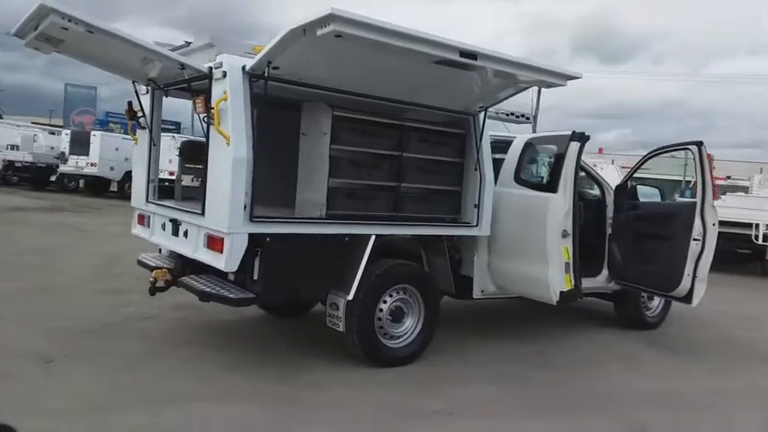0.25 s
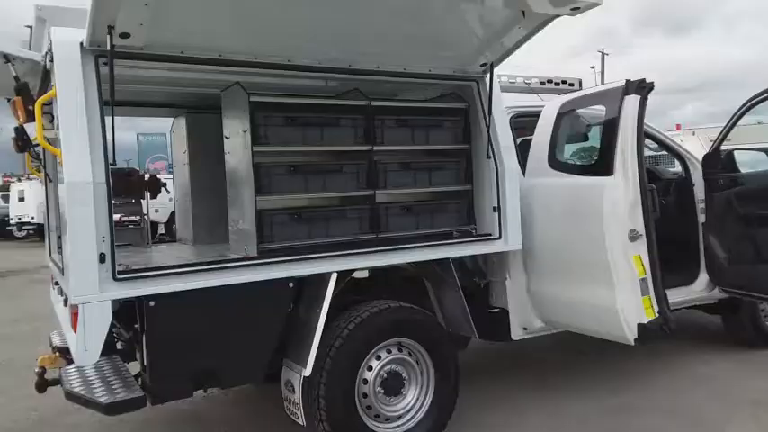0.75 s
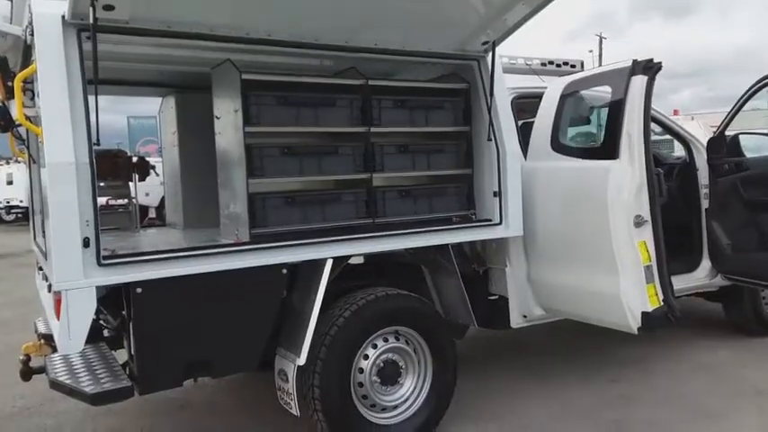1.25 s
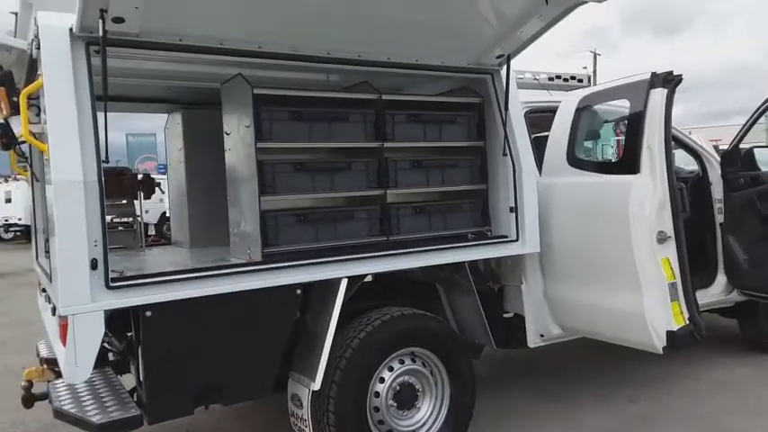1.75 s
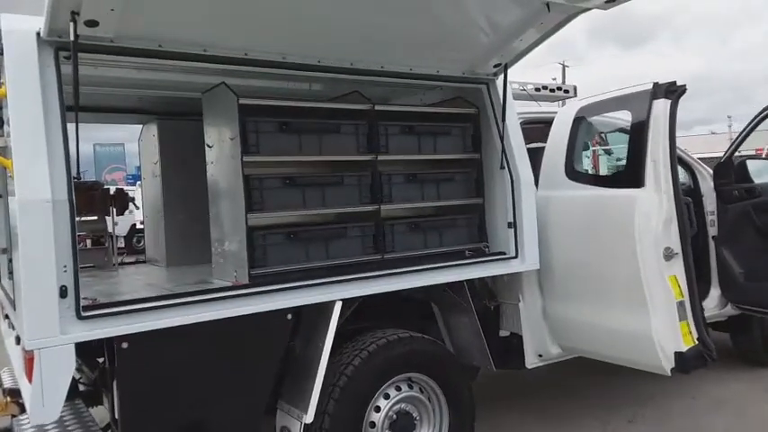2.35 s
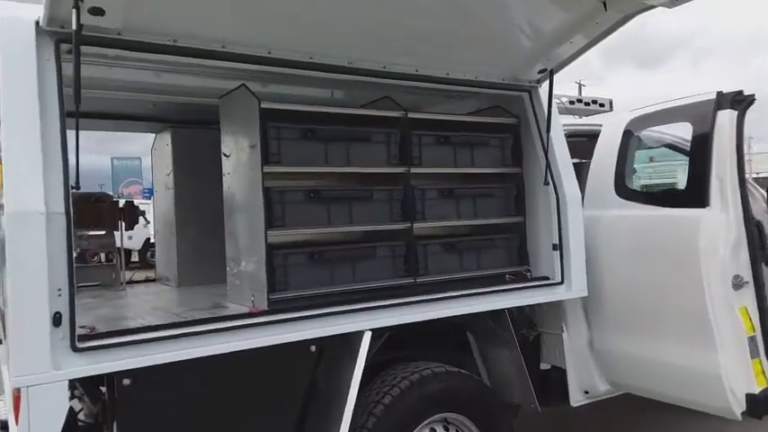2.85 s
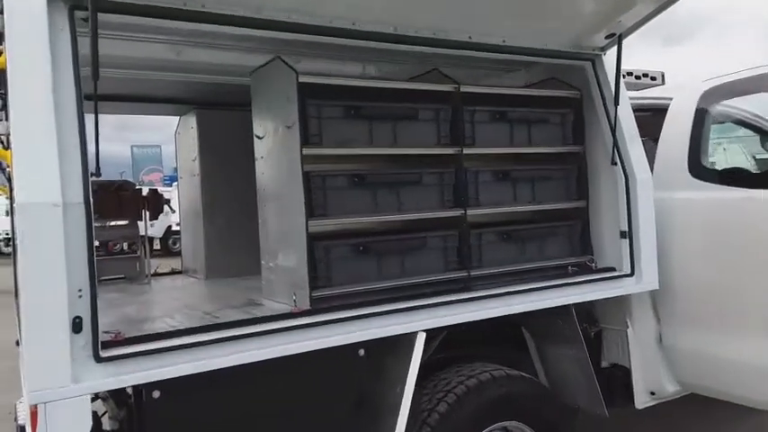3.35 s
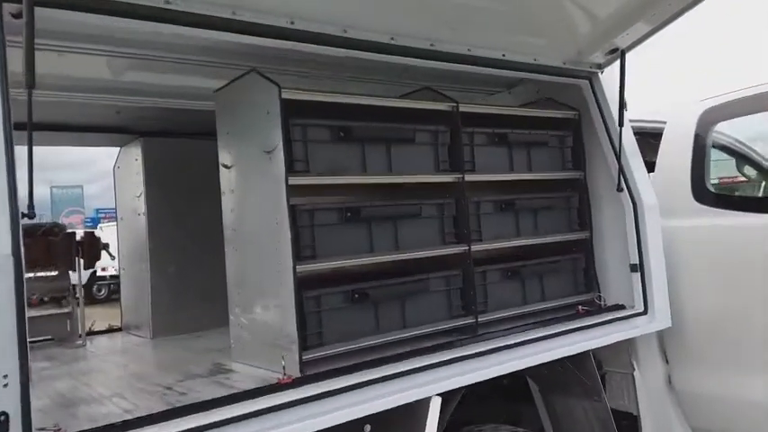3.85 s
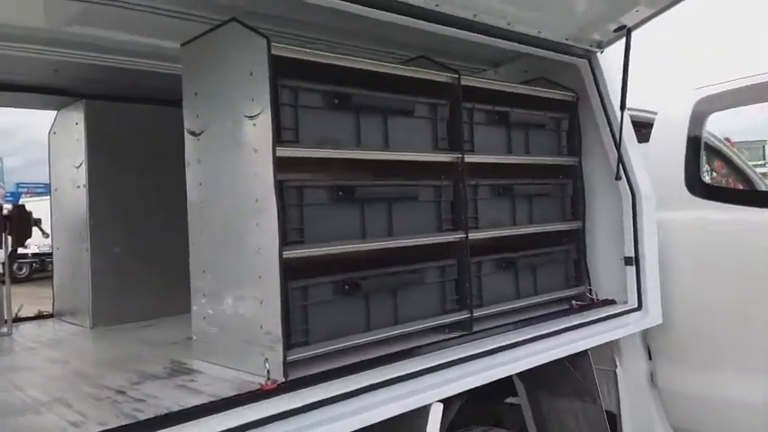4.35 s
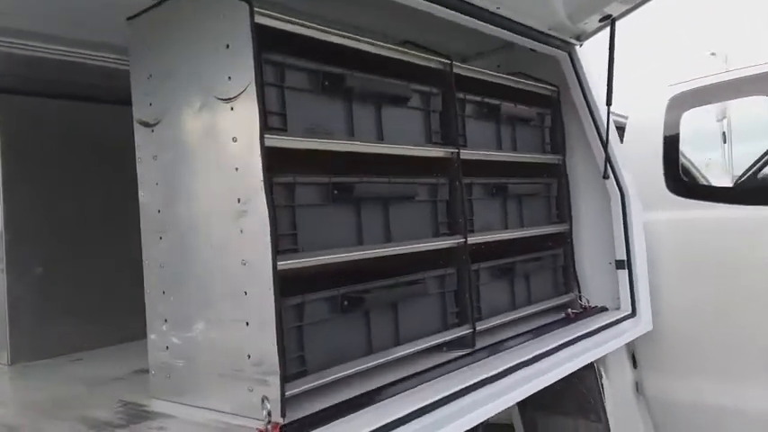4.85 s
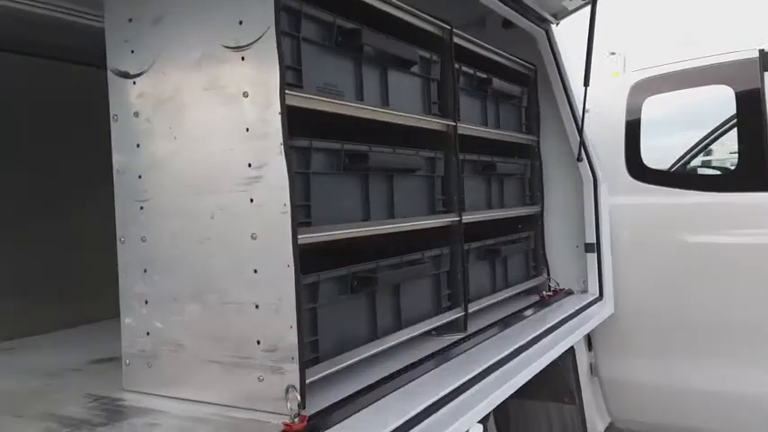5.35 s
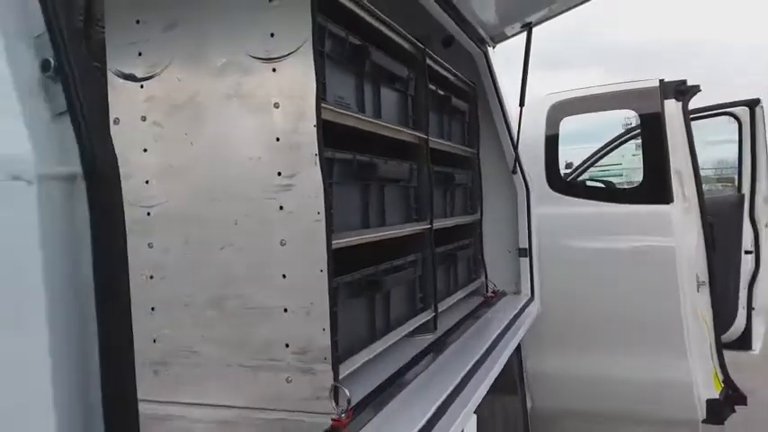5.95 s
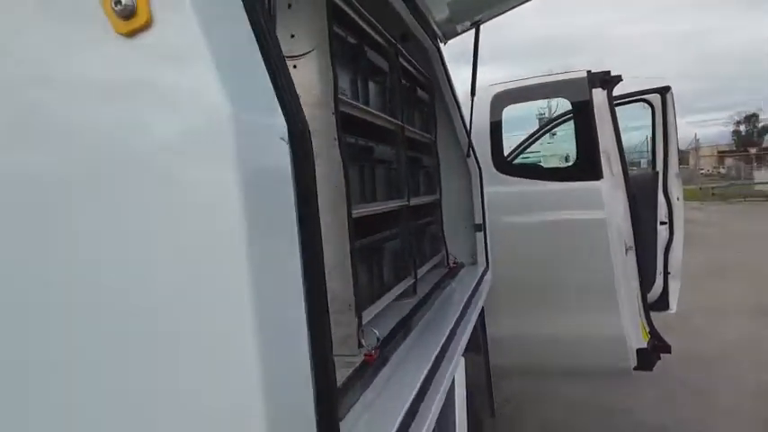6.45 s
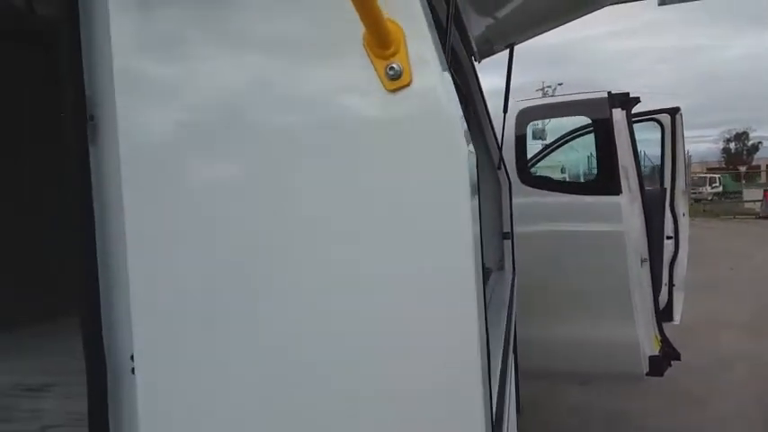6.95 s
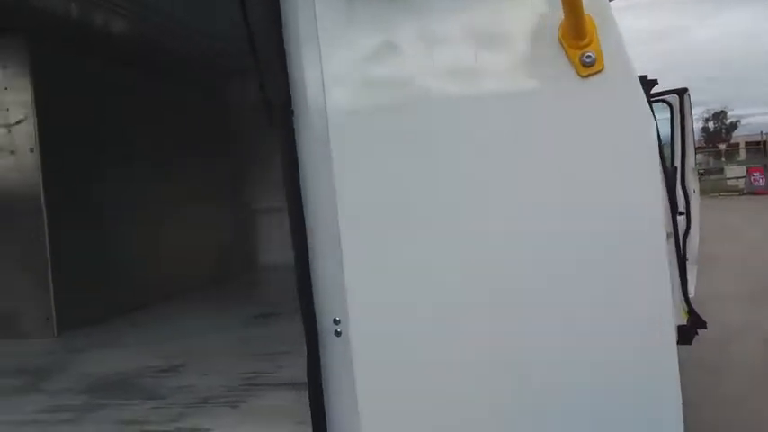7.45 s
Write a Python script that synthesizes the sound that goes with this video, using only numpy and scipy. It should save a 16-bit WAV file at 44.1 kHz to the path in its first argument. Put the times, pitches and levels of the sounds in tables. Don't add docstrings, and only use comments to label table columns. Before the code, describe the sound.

A diesel truck idles continuously outdoors, with rapid metallic knock, low exhaust hum, broad fan-like roar and fine hiss. After initial silence it fades in quickly and comes near. Low wind bumps hit one side of the handheld stereo microphone; dry footsteps snap and scuff on grit, with small distant bird chirps. Near the end the treble drops and a hollow hum grows from the open load box.

```python
import sys
import numpy as np
from scipy import signal
from scipy.fft import rfft, irfft, next_fast_len
from scipy.io import wavfile
from scipy.ndimage import uniform_filter1d, map_coordinates

SR = 44100
rng = np.random.default_rng(int(sys.argv[2]) if len(sys.argv) > 2 else 0)


def nominal_scale(level):
    x = np.asarray(level, float) / 20
    return 10 ** x


def materialize(psi):
    bounded = np.clip(np.atleast_2d(psi).T, -1, 1)
    quanta = np.round(bounded * 32767).astype(np.int16)
    wavfile.write(sys.argv[1], SR, quanta)


N = 340011
T = np.arange(N) / SR
FIRE_HZ, FIRST_FIRE_S = 26.72, 2.011


def engine():
    # time in seconds, nearness in dB,
    # screening of the engine bay by the body in dB, extra path of the load box echo in metres.
    approach = [(1.0, -8.5, 1, 4.4), (1.2, -6.5, 0, 4.2), (1.79, -5.5, 0.5, 4.6), (1.9, -3, 0.5, 4.6),
                (2.14, -.3, 0, 4), (3.0, 0.15, 0, 4.4), (3.9, -0.53, .5, 4.3), (4.6, 0.24, 0.16, 4.5),
                (5.45, -0.2, .2, 1.8), (5.7, -1.15, -0.7, 2), (6.25, -0.1, -4, 1.5), (6.55, .2, -6, 1),
                (6.9, 0, -7, 0.99), (7.2, 0, -6, 1), (7.71, -0.2, -5.5, 1.1)]
    # frequency in Hz, level in dB per Hz.
    rumble_colour = [(14, -40), (22, -20), (40, -9.5), (60, -2.5), (112, 0), (160, -0.5), (262, -5),
                     (310, -8), (370, -18), (500, -23), (700, -62)]
    roar_colour = [(210, -38), (350, -2), (451, -5.5), (547, -2.5), (922, -3), (1020, -5), (1590, -8),
                   (1890, -10.5), (2200, -14.5), (2860, -26), (4840, -120)]
    bay_colour = [(1060, -34), (1800, -4), (2190, -5), (2890, -1.5), (3330, -4), (3660, -3), (3990, -6),
                  (6000, -16), (7800, -22), (13200, -120)]
    hiss_colour = [(2820, -17.5), (4800, -4), (4940, -5.5), (7240, -8), (8490, -5.5), (12600, -13),
                   (14000, -18), (15700, -21.5)]

    near_db, screen_db, path_m = curves(approach)
    rumble_db = -36.5 + near_db - 0.092 * screen_db
    roar_db = -43.5 + near_db + 0.28 * screen_db
    bay_db = -46.5 + near_db + 0.82 * screen_db
    hiss_db = -54 + near_db + 0.99 * screen_db

    modes, throb = knock()
    rumble = coloured(rumble_colour, 1.85, 9)
    roar = (0.87 + 0.18 * throb) * coloured(roar_colour, 0.97, 9)
    bay = nominal_scale(-1) * (0.68 + 0.32 * throb) * coloured(bay_colour, 0.8, 12)
    bay = bay + nominal_scale(-3.5 + 0.6 * screen_db) * modes * np.array([[1.15], [0.75]])
    hiss = (0.92 + 0.13 * throb) * coloured(hiss_colour, 0.96, 10)
    injectors = unit(band(rng.standard_normal((2, N)), 10500, 14200))
    hiss = hiss + nominal_scale(-13 + 2 * walk(14)) * throb * injectors

    pair = nominal_scale(rumble_db - 2) * rumble + nominal_scale(roar_db + 0.57) * roar
    pair = pair + nominal_scale(bay_db + 1) * bay + nominal_scale(hiss_db + 1.5) * hiss
    pair[0] += nominal_scale(0.1) * (exhaust(near_db, bay_db, path_m) + load_box() + second_motor())
    return pair


def exhaust(near_db, bay_db, path_m):
    # firing order, rms in dB.
    pipe_orders = [(2, -47.5), (3, -54), (4, -45), (7, -50.5), (10, -56)]
    # firing order, level in dB re the engine bay.
    block_orders = [(5, -12.5), (6, -10), (8, -3.5), (9, -8)]
    pipe_db = near_db + 1.2 * (T - 6.86)
    turn = 2 * np.pi * FIRE_HZ * (T - FIRST_FIRE_S)

    def hum(order, level):
        phase = order * turn + 6.3 * rng.random() + 0.39 * walk(2.98)
        return level * nominal_scale(1.7 * walk(4)) * np.sqrt(2) * np.sin(phase)

    out = np.zeros(N)
    for order, db in pipe_orders:
        order = round(order)
        echo = np.abs(1 - 0.31 * np.exp(2j * np.pi * order * FIRE_HZ * path_m / 343))
        out += hum(order, nominal_scale(pipe_db + db) * echo)
    for order, db in block_orders:
        out += hum(round(order), nominal_scale(bay_db + db))
    return out


def knock():
    # frequency in Hz, width in Hz, level in dB.
    block_modes = [(2425, 50, -2.5), (2760, 80, -7), (2897, 70, -1), (3120, 80, -6), (3745, 75, -1.5),
                   (4498, 50, -1.5), (8440, 310, -18), (11800, 300, -22)]
    cylinder_db = [-1, -0.32, 1.4, -0.98]

    cycle = (T - FIRST_FIRE_S) * FIRE_HZ
    index = np.floor(cycle).astype(int)
    since = (cycle % 1) / FIRE_HZ
    index = index - index[0] + (index[0] % 4)
    size = nominal_scale(2.1 * rng.standard_normal((index[-1] + 1, 2 * len(block_modes))))
    strength = nominal_scale(np.array(cylinder_db)[index % 4])
    pilot = np.exp(-since / 0.002)
    late = np.maximum(since - 0.009, 0)
    main = (late > 0) * (np.exp(-late / 0.0015) + 0.32 * np.exp(-late / 0.016))
    out = 0
    for k, (hz, width, db) in enumerate(block_modes):
        pilot_size, main_size = size[index, 2 * k], size[index, 2 * k + 1]
        burn = strength * (pilot_size * pilot + 0.76 * main_size * main + 0.18)
        mode = unit(ring(burn * rng.standard_normal((2, N)), hz, 0.9 * width))
        out = out + nominal_scale(db) * np.sqrt(width) * mode
    return unit(out), unit(strength * np.exp(-since / 0.033))


def load_box():
    # time in seconds, frequency in Hz, rms in dB.
    boom = [(5.2, 280, -74), (5.9, 272, -53), (6.6, 268.6, -53), (7.1, 264.2, -49.5), (7.4, 260.2, -45.5),
            (7.71, 257.6, -44)]
    hz, db = curves(boom)
    phase = 2 * np.pi * np.cumsum(hz) / SR + 1.1 * walk(16)
    return nominal_scale(db + 1 + 2.5 * walk(16)) * np.sqrt(2) * np.sin(phase)


def footsteps():
    # time in seconds, peak in dB, centre in Hz, cycles, lag of the right port in samples.
    ticks = [(3.4950, -30, 11000, 2.5, 4), (3.4955, -22.5, 5200, 2.5, 3), (3.6005, -21, 1400, 1.5, 5),
             (3.9225, -28, 1200, 1.3, 5), (4.6470, -22, 1310, 0.98, 10), (4.6507, -20, 1450, 1.3, 8),
             (5.312, -38.5, 4500, 90, 0), (5.3885, -28, 8000, 1.2, 4), (5.4761, -17.5, 1550, 1, 6),
             (5.536, -25, 2600, 2.5, 5), (5.545, -29, 1800, 3.5, 6), (5.5945, -28, 7000, 1.1, 5),
             (6.298, -35, 1800, 1.4, 4), (6.4045, -28, 2100, 3.5, 2), (6.4062, -29, 3200, .9, 2),
             (6.416, -39, 4750, 20, 1.5), (7.2349, -25.5, 3800, 2.1, 11), (7.238, -29.5, 2320, 2.2, 4.5),
             (7.399, -38, 9000, 3.5, 5), (7.4718, -26, 4500, .8, 1.5), (7.5103, -25, 10500, 1.1, 5)]
    # start in seconds, length in seconds, rms in dB, low edge in Hz, high edge in Hz.
    scuffs = [(3.494, .014, -39, 4200, 12800), (3.503, 0.018, -36.5, 2900, 10000),
              (3.505, .02, -55, 12000, 15800), (4.636, 0.043, -41, 600, 3800),
              (5.283, .045, -45.5, 4000, 11900), (5.386, .03, -49, 5000, 10000),
              (5.488, 0.09, -46.5, 3000, 10700), (5.489, .075, -39, 700, 3200),
              (5.59, .3, -57, 5000, 15500), (6.213, .055, -50.5, 4300, 7000),
              (6.401, .03, -48.5, 1500, 7500), (7.15, .09, -59, 10000, 15500), (7.18, .06, -58, 3500, 5500),
              (7.455, 0.26, -57, 6500, 15000), (7.498, 0.033, -53, 7000, 13000),
              (7.591, .05, -54, 7000, 14000)]
    pan_db = 1.5

    out = np.zeros((2, N))
    for s, db, hz, cycles, lag in ticks:
        add(out[0], s, db, hz, cycles)
        add(out[1], s + lag / SR, db, hz, cycles)
    for s, length, db, lo_hz, hi_hz in scuffs:
        x = (T - s) / length
        shape = np.clip(x * 15, 0, 1) * np.exp(-np.clip(x, 0, 9) ** 3)
        grit = rng.standard_normal((3, N)) * nominal_scale(1.7 * rng.exponential(size=N))
        grit = grit[:2] + 0.82 * grit[2]
        grit = unit(band(band(grit, lo_hz, hi_hz), lo_hz, hi_hz))
        out += shape * grit * nominal_scale([[db + pan_db / 2], [db - pan_db / 2]])
    return out


def gust():
    # time in seconds, peak in dB, centre in Hz, cycles.
    thumps = [(2.562, -26, 110, 1.5), (2.661, -22, 110, 1.6), (2.748, -17.5, 173, 2.1),
              (2.813, -19.5, 110, 1.2), (2.83, -17, 220, 1.1), (2.842, -21, 85, 1.7),
              (2.878, -22, 89.5, 1.7), (2.94, -16.5, 173, 2.3), (2.972, -14.5, 135, 1.3),
              (3.017, -26, 85, 1.4)]
    out = np.zeros(N)
    for thump in thumps:
        add(out, *thump)
    return np.outer([0.06, 1], out)


def sparrow():
    # time of the crest in seconds, crest in Hz, lead-in in dB, crest in dB, falling tail in dB.
    chirps = [
        (4.531, 4680, -52, -47, -62),
        (5.970, 5450, -52, -60, -51),
        (7.029, 5760, -54, -48.5, -55),
    ]
    lead_hz, end_hz, drop = 4660, 3400, 0.85
    lead_s, lead_width_s, crest_s, tail_s = 0.015, 0.006, 0.005, 0.1
    trill_hz = 31

    def bell(x, width):
        return np.exp(-(x / width) ** 2)

    out = 0
    for s, crest_hz, lead_db, crest_db, tail_db in chirps:
        x = T - s
        hz = np.interp(x, [-lead_s + crest_s, -crest_s, crest_s, 2 * crest_s, tail_s],
                       [lead_hz, crest_hz, crest_hz, drop * crest_hz, end_hz])
        trill = 0.55 - 0.45 * np.cos(2 * np.pi * trill_hz * x)
        tail = np.exp(-((x - 0.61 * tail_s) / (0.48 * tail_s)) ** 4) * trill
        shape = nominal_scale(lead_db) * bell(x + lead_s, lead_width_s)
        shape = shape + nominal_scale(crest_db) * bell(x + 0.001, crest_s) + nominal_scale(tail_db) * tail
        rasp = nominal_scale(2.2 * walk(90)) * (1 + 0.4 * walk(400))
        out = out + shape * rasp * np.sqrt(2) * np.sin(2 * np.pi * np.cumsum(hz) / SR)
    echo = 0.25 * np.roll(out, 900) + 0.15 * np.roll(out, 2300)
    return np.array([out + echo, 1.1 * out + np.roll(echo, 300)])


def second_motor():
    # time in seconds, frequency in Hz, rms in dB.
    drone = [(3.9, 74.6, -43), (4.41, 74.8, -40), (5.04, 78.2, -39), (5.7, 80.0, -43), (6.65, 80.15, -40)]
    hz, db = curves(drone)
    start, end = drone[0][0], drone[-1][0]
    swell = np.interp(T, [start - 0.4, start, end, end + 0.44], [0, 1, 1, 0])
    phase = 2 * np.pi * np.cumsum(hz) / SR + 0.4 * walk(5)
    return swell * nominal_scale(db - 1.5 + 1.2 * walk(6)) * np.sqrt(2) * np.sin(phase)


def ports(common, diffuse):
    # frequency in Hz, share common to both ports from 0 to 1.
    likeness = [(60, .88), (250, .94), (500, .9), (1000, .4), (3000, .22), (12000, .03)]
    # frequency in Hz, left minus right in dB.
    balance = [(60, -1.8), (110, -0.83), (200, -0.98), (380, -1.6), (700, -1.2), (1290, -1.5), (2380, -0.5),
               (4400, 0.5), (8120, 0.98), (15000, -1.2)]
    # time in seconds, lag in samples.
    left_lag = [(0, 0.5), (3, 2.5), (5, -1), (5.6, 0), (6, 9), (7.7, 7)]

    size = next_fast_len(N)
    hz = np.fft.rfftfreq(size, 1 / SR)
    alike = np.clip(over_hz(likeness, hz), 0, 1)
    tilt = nominal_scale(np.outer([0.5, -0.5], over_hz(balance, hz)))
    mid = irfft(rfft(common, size) * np.sqrt((1 + alike) / 2) * tilt, size)[:, :N]
    side = irfft(rfft(diffuse, size) * np.sqrt((1 - alike) / 2) * tilt, size)[:, :N]
    left, right = mid[0] + side[0], mid[1] - side[1]
    left = map_coordinates(left, [np.arange(N) - curves(left_lag)[0]], order=3)
    return np.array([left, right])


def add(out, s, db, hz, cycles):
    half = 2 * int(cycles * SR / hz)
    t = np.arange(-half, half) / SR
    i = int(s * SR) - half
    blow = -np.cos(2 * np.pi * hz * t - 0.5) * np.exp(-(2 * t * hz / cycles) ** 2)
    out[i:i + len(t)] += nominal_scale(db) * blow


def coloured(spectrum, flicker_db, rate):
    size = next_fast_len(N)
    hz = np.fft.rfftfreq(size, 1 / SR)
    noise = rfft(rng.standard_normal((2, size))) * nominal_scale(over_hz(spectrum, hz))
    half_octave = 2 * np.log2(np.maximum(hz, 1))
    first, last = int(2 * np.log2(spectrum[0][0])), int(2 * np.log2(spectrum[-1][0])) + 1
    out = 0
    for k in range(first, last + 1):
        share = np.cos(np.pi / 2 * np.clip(half_octave - k, -1, 1)) ** 2
        out = out + irfft(noise * share, size)[:, :N] * nominal_scale(flicker_db * walk(rate))
    return unit(out)


def walk(rate):
    k = int(SR / rate)
    held = np.repeat(rng.standard_normal(N // k + 1), k)
    return 1.26 * uniform_filter1d(uniform_filter1d(held, k), k)[:N]


def ring(x, hz, width_hz):
    return signal.lfilter(*signal.iirpeak(hz, hz / width_hz, fs=SR), x)


def band(x, lo_hz, hi_hz):
    return signal.sosfilt(signal.butter(2, [lo_hz, hi_hz], "bandpass", fs=SR, output="sos"), x)


def unit(x):
    return x / np.sqrt(np.mean(x ** 2))


def curves(table):
    s, *columns = np.transpose(table)
    return [np.interp(T, s, c) for c in columns]


def over_hz(table, hz):
    f, value = np.transpose(table)
    return np.interp(np.log(np.maximum(hz, 1)), np.log(f), value)


def scene():
    return ports(*engine()) * nominal_scale(2.5) + footsteps() + sparrow() + gust()


def top_cut(x):
    return signal.sosfilt(signal.butter(12, 15850, fs=SR, output="sos"), x)


def record(dry):
    # time in seconds, level in dB.
    fade_in = [(.772, -69), (.79, -24), (.80, -15), (.815, -3.5), (.84, -1)]
    audible = T > fade_in[0][0]
    return top_cut(dry * nominal_scale(curves(fade_in)[0]) * audible)


dry = scene()
out = record(dry)
materialize(out)
```